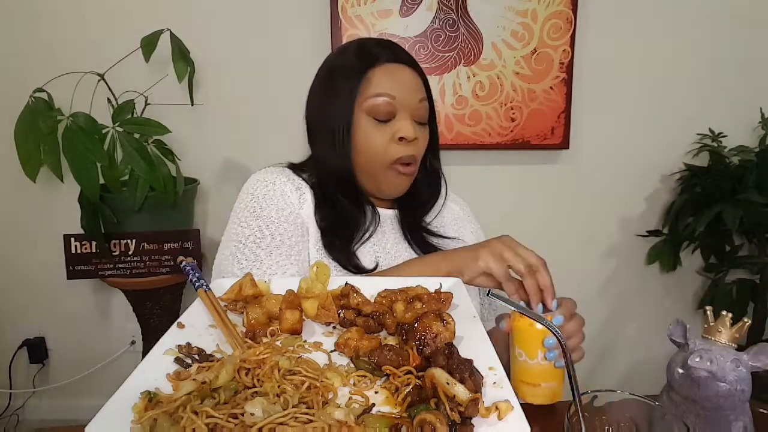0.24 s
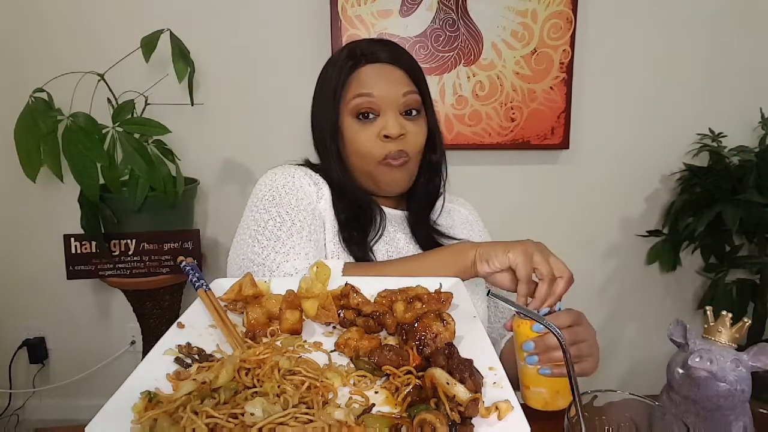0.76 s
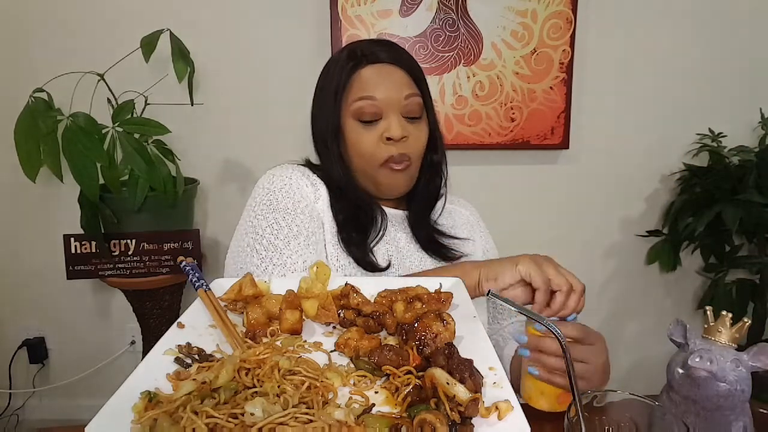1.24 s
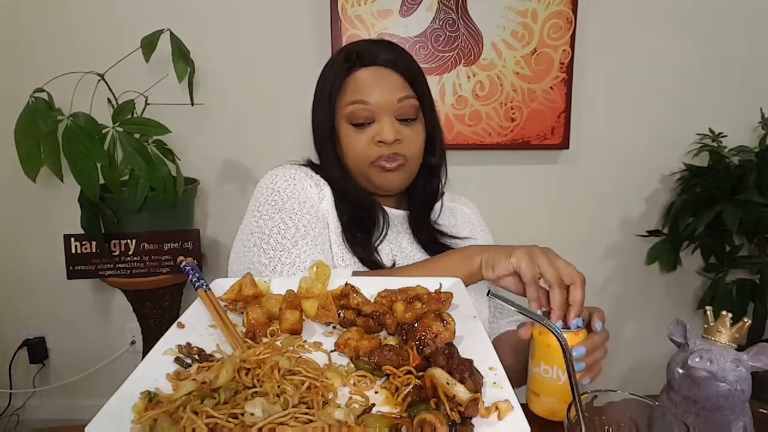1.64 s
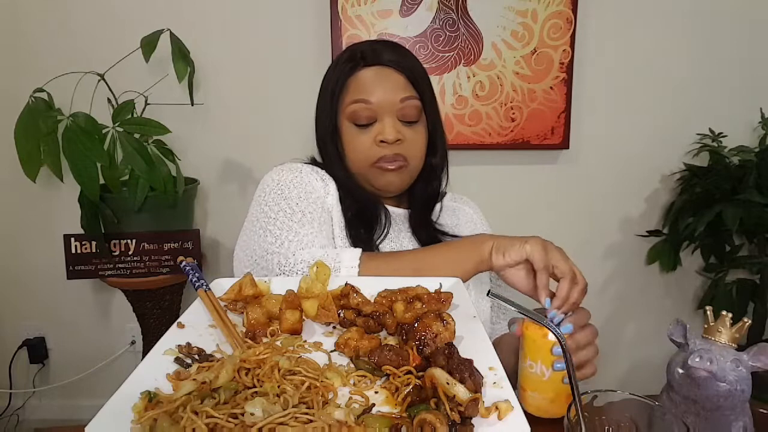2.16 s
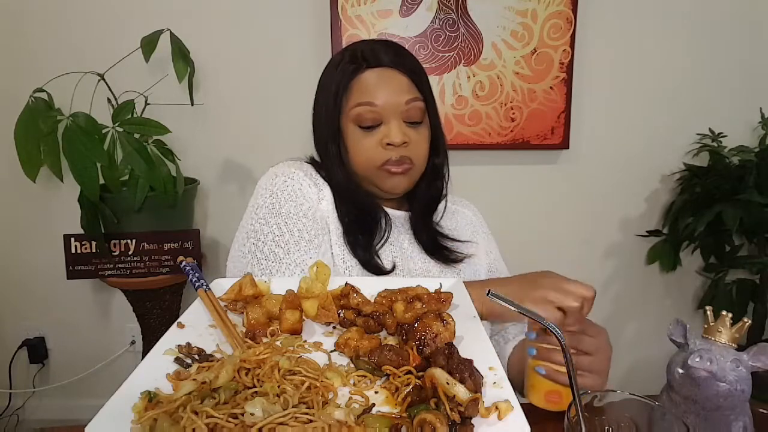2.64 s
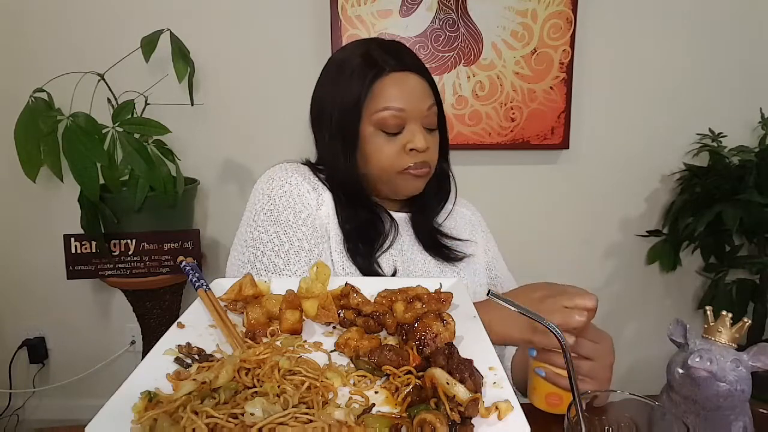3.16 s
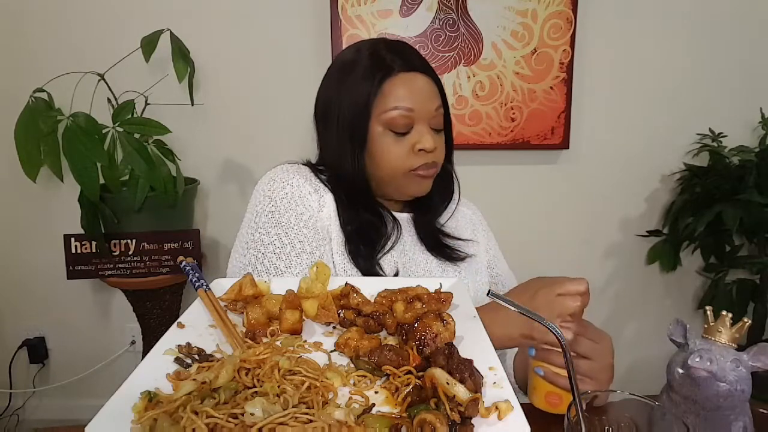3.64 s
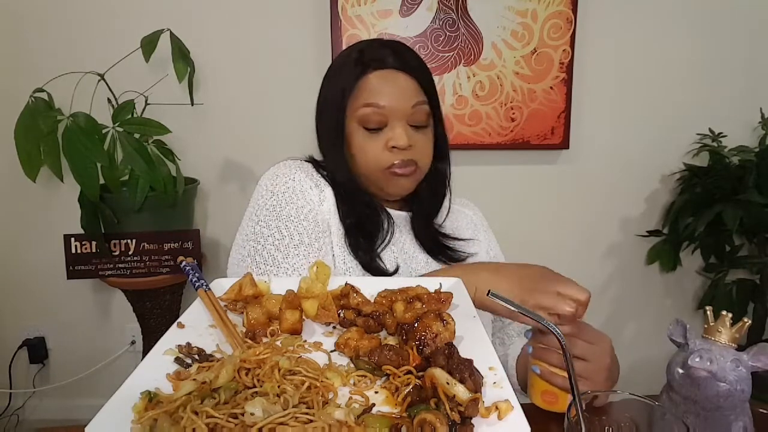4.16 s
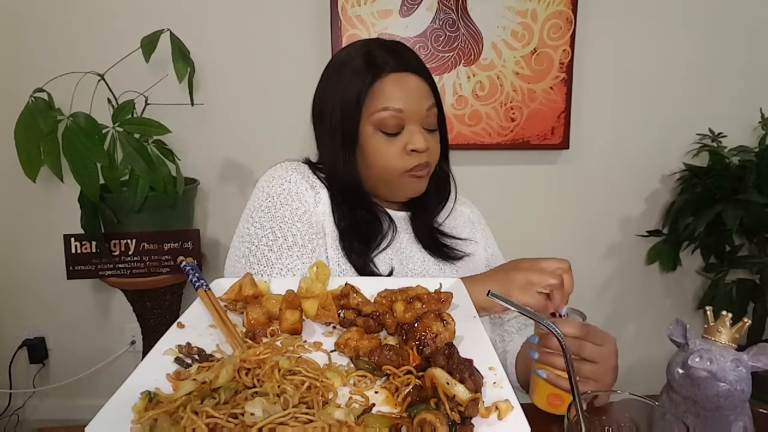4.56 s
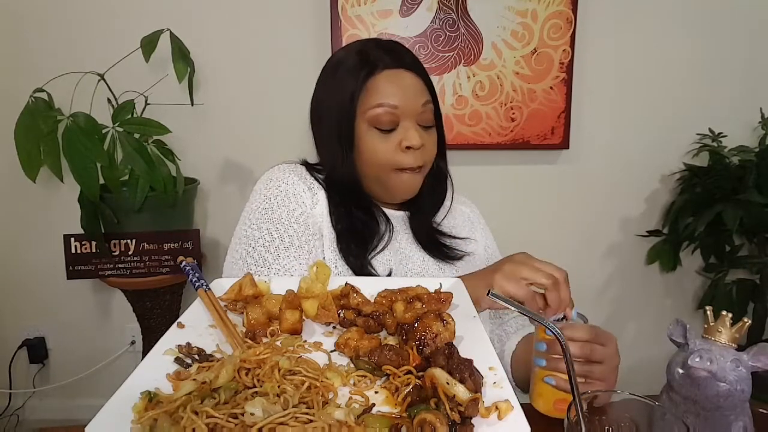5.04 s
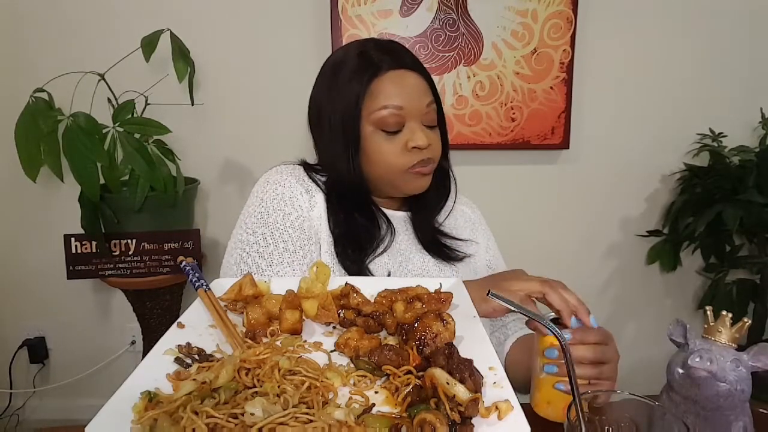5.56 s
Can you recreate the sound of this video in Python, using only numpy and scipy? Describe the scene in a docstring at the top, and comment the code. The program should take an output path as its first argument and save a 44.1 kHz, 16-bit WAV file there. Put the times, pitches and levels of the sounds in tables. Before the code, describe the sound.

Soft knocks and fingernail clicks on a drink can lead to a short fizz, a tab snap and one loud opening pop.

```python
"""A drink can's lid tears open with a loud pop: fracturing aluminium excites the lid and the thin shell.
Before the pop, the can bumps the table and long nails pick at the tab, setting off damped modes;
the seal cracks and a turbulent gas jet hisses, the tab snaps, and the can scuffs by stick-slip friction.
Faint clicks, squeaks and finger rubs come before and after. One microphone hears it all in a bare,
reverberant room with a low steady hush."""
import sys
import numpy as np
from scipy import signal
from scipy.io import wavfile

SR = 44100
rng = np.random.default_rng(int(sys.argv[2]) if len(sys.argv) > 2 else 0)


def waveform_to_disk(signal):
    """Save audio, clipped to [-1, 1], as 16-bit WAV at the path in sys.argv[1]."""
    frames = np.transpose(np.atleast_2d(signal))
    scaled = np.clip(frames, -1, 1) * 32767
    samples = np.round(scaled).astype(np.int16)
    wavfile.write(sys.argv[1], SR, samples)


N = 255364
TAPS = 4096
HZ, TIME = np.fft.rfftfreq(TAPS, 1 / SR), np.arange(N) / SR

# spectra of the panel tearing and the tab snapping: (frequency [Hz], relative level [dB])
POP_SPECTRUM = [(29, -54.5), (50, -23.5), (193, -18.5), (234, -7.5), (371, -18), (601, -15.5), (927, -7.5),
                (1400, -6.5), (2750, -4), (3100, -9), (4140, -4.5), (5400, -14), (8340, -9), (9180, -18),
                (16000, -23)]
SNAP_SPECTRUM = [(150, -31), (280, -12.5), (570, -14.5), (1250, -20.5), (2100, -9), (3200, -10.5),
                 (4000, -5), (4800, -13), (5600, -11), (7400, -10), (10500, -16.5), (14000, -17.5),
                 (15700, -26.5)]
# lid resonances on those spectra: (frequency [Hz], bandwidth [Hz], relative level [dB])
POP_RESONANCES = [(1020, 130, -0.5), (2307, 61, 3.5), (2800, 240, 4), (4250, 270, -8), (7150, 630, -2)]
SNAP_RESONANCES = [(2100, 90, 4.4), (2290, 110, 2.3), (3070, 200, 9.6), (3360, 61, 14), (3850, 30, 11),
                   (5690, 100, 5.2), (7400, 64, 4.8), (12700, 72, 6), (13650, 300, 4)]
# modes of the can's shell and of the table: (frequency [Hz], relative level [dB], t60 [s])
SHELL_MODES = [(1007, -4, 0.7), (1183, 4.5, 0.8), (1486, -7, 1), (1595, -6, 0.63), (2160, -3, 0.84),
               (2150, -3, 0.62), (2634, -3, 0.41), (2750, 4, 0.23), (2780, -9.5, .7), (3350, -9.5, 1),
               (3730, -1.5, 0.47), (4280, -1, 0.64), (6570, -9.5, 0.45), (7900, 2, .55)]
TABLE_MODES = [(170, 1, 0.2), (228.6, -0.5, 0.15), (231.5, -3.5, 0.28), (306, -7, 0.41), (407, -4.5, 0.64),
               (493, -22, .42), (626, -21.5, .42), (2110, -12, 0.69), (2170, -22, 0.29)]
# spectra of the gas jet, wide and then thin: (frequency [Hz], relative level [dB])
WIDE_JET_SPECTRUM = [(200, -6.5), (1000, -19), (2500, -21), (4300, 3), (6500, -1), (8500, -8), (11000, -3),
                     (16000, -20)]
THIN_JET_SPECTRUM = [(200, -18), (1200, -16), (2500, -9.5), (4300, -10), (6000, -10.5), (8200, 1),
                     (10500, -9), (13000, -7.5), (16000, -12.5)]
# can bumping the table: (time [s], level [dB], low-pass cut-off [Hz])
CAN_KNOCKS = [(0.001, -29, 1700), (0.835, -16, 1900), (0.8555, -22, 402), (1.3086, -21, 2010),
              (1.638, -33, 1300), (1.883, -40.5, 1100), (1.989, -47, 1230), (2.14, -37.5, 1100),
              (2.406, -32, 1480), (2.68, -41, 800), (5.113, -40.5, 500)]
# nails, tab and cracking seal flicking the lid:
# (time [s], level [dB], lower mode [Hz], t60 [s], upper mode re lower [dB], tick re lower [dB])
LID_CLICKS = [(0.2445, -42.5, 3527, 0.036, -18, 2), (0.46, -46, 1430, 0.0073, 0, -2.5),
              (0.471, -47, 2050, .017, -7, -7), (0.489, -49, 1320, 0.026, -5, -13),
              (1.226, -52, 1100, 0.0036, -14, -18), (1.3208, -36, 2270, 0.0047, 1, -4.5),
              (1.4809, -47, 1530, 0.0081, -15, -5), (1.6291, -37, 2300, 0.011, -14.5, -7),
              (1.7206, -48.5, 2330, .012, -9, 14), (1.8799, -47, 3320, 0.0084, -26, 5),
              (2.0759, -46.5, 3820, .01, -20, -4.5), (2.1383, -42, 1404, 0.025, -2, 6.5),
              (2.296, -61.5, 4550, .013, 4, 12), (2.6798, -54, 1520, .013, -4, -2),
              (2.962, -26, 4260, 0.0029, -10, -8), (3.1459, -22.5, 1993, 0.0057, 1.5, -12),
              (3.5676, -57.5, 3100, .005, -16, -14), (3.599, -58.5, 1480, .02, -12, -17),
              (3.6124, -46.5, 2950, 0.0018, -15, -1.5), (4.201, -47, 1345, .025, -30, -25),
              (4.864, -43, 4540, .01, 11, 14), (5.2408, -59, 5660, .01, -6, 13),
              (5.767, -36, 1850, 0.0083, -5.5, -2.5)]
# contact spectra of a knock and of a click: (frequency [Hz], relative level [dB])
THUD_SPECTRUM = [(40, -38), (80, 1.5), (130, -4), (220, 8.5), (330, -4.5), (600, -5.5), (850, -12.5),
                 (1200, -12), (1500, -9.5), (1900, -19), (2100, -11), (3000, -23), (9000, -30.5)]
TICK_SPECTRUM = [(150, 4), (700, -11.5), (1500, -11.5), (4000, -8.5), (6000, -8), (8300, -9),
                 (10500, -18.5), (16000, -19.5)]
# can sliding on the table, and fingers on the can: (time [s], duration [s], level [dB])
BASE_SCUFFS = [(3.928, 0.0078, -50), (4.039, 0.12, -43), (4.3, 0.05, -55.5)]
FINGER_RUBS = [(-0.03, 0.025, -44.5), (1.42, 0.37, -59), (2.57, 0.17, -62), (4.98, .2, -64),
               (5.28, 0.034, -68.5), (5.445, 0.03, -65)]
# spectra of those two kinds of friction: (frequency [Hz], relative level [dB])
SCUFF_SPECTRUM = [(50, -22.5), (110, -11), (240, 2), (420, -3), (520, -4), (700, -18.5), (850, -18),
                  (1050, -9), (1260, -25.5), (1540, -19.5), (2200, -28), (6000, -40), (12000, -52.5)]
RUB_SPECTRUM = [(200, -4), (700, 2), (1450, 5.5), (2300, 0.5), (2800, -2.5), (3400, -1.5), (5000, -12),
                (8000, -15.5), (11000, -30), (16000, -22)]
# the base catching and jumping on: (time [s], level [dB])
BASE_JOLTS = [(3.944, -46), (4.0499, -43), (4.0764, -34), (4.136, -39.5)]
# nails and tab sliding on the lid: (time [s], duration [s], level [dB], frequency [Hz])
LID_SQUEAKS = [(0.489, 0.0084, -58, 2035), (1.626, .02, -52, 1470), (3.587, 0.037, -66, 5580),
               (3.62, 0.069, -60, 5700), (5.084, 0.03, -57, 3224), (5.48, 0.032, -71, 3280),
               (5.483, 0.019, -71.5, 7960)]
# the table's low hum swelling as the can is pushed along: (time [s], duration [s], level [dB])
HUM_SWELLS = [(-0.02, 0.053, -42), (0.12, 0.33, -54.5), (0.61, 0.1, -63)]
# reflections from the cluttered table top and a near wall: (delay [s], relative level [dB])
EARLY_ECHOES = [(.0026, -7.5), (.0076, -5.5)]
# the room's reverberation time: (frequency [Hz], t60 [s])
REVERB_TIMES = [(100, 0.96), (240, 0.49), (700, 0.73), (1400, 0.85), (3000, 0.69), (5500, 0.74),
                (8000, 0.62), (11000, .52), (16000, 0.48)]
# spectrum of the room's hush: (frequency [Hz], relative level [dB])
HUSH_SPECTRUM = [(20, -4), (30, 4.5), (50, -6.5), (87, 3), (190, 0), (270, -0.5), (450, -10), (714, -16.5),
                 (1480, -21.5), (2840, -21), (7710, -32.5), (14800, -35.5), (16000, -35.5)]


def lid_pop(s=4.5583, shell_db=-20.5):
    """Impulsive excitation: the scored panel fractures, and the shell rings on in free vibration."""
    pop = fracture(s, POP_SPECTRUM, POP_RESONANCES,
                   crack_db=-10.5, crack_s=0.00027, rip_db=-16, rip_s=0.012, room_db=9)
    add(pop, s, blow(shell_db) * modal_ring(SHELL_MODES))
    return pop


def tab_snap(s=3.7079):
    """Sudden release of stress: the tab gives way and excites the lid's resonances."""
    return fracture(s, SNAP_SPECTRUM, SNAP_RESONANCES,
                    crack_db=-35, crack_s=0.0015, rip_db=-30.5, rip_s=0.0079, room_db=4)


def fracture(s, spectrum, resonances, crack_db, crack_s, rip_db, rip_s, room_db):
    """Source and filter: one crack and a decaying run of tiny fractures drive the resonant lid."""
    force, impulse = np.zeros((2, N))
    add(force, s, blow(crack_db) * burst(crack_s))
    add(force, s, blow(rip_db) * burst(rip_s))
    add(impulse, s, np.array([blow(rip_db + room_db)]))  # the room answers the whole rip as one blow
    peaks = sum(gain_of(db) ** 2 / (1 + (2 * (HZ - hz) / width) ** 2) for hz, width, db in resonances)
    lid_db = read(spectrum) + 10 * np.log10(1 + peaks)
    return through(with_echoes(force) + reverb(impulse, build_s=rip_s), lid_db)


def gas_hiss(start_s=2.962, length_s=0.2, db=-31.5, narrowing_s=0.024, wide_db=-2, room_db=-1):
    """Turbulent jet noise: gas escapes the cracked seal, thinning and brightening as pressure drops."""
    age = np.maximum(TIME - start_s, 0)
    thin_share = 0.85 * (1 - np.exp(-age / narrowing_s))
    wide = through(grains(per_s=25000, spread_db=2.5), read(WIDE_JET_SPECTRUM))
    thin = through(grains(per_s=25000, spread_db=2.5), read(THIN_JET_SPECTRUM))
    flow = strokes([(start_s, length_s, db)], attack_s=0.0094, fall_db_per_s=616)
    hiss = flow * (gain_of(wide_db) * np.sqrt(1 - thin_share) * wide + thin_share * thin)
    return hiss + gain_of(room_db) * reverb(hiss)


def can_knocks(ring_db=-3, room_db=-5.5, settle_s=0.028, contact_s=0.00034):
    """Impact: the can's rim settles and excites the table's modes; softer contact gives less treble."""
    out = np.zeros(N)
    for s, db, cutoff_hz in CAN_KNOCKS:
        body = gain_of(ring_db) * modal_ring(TABLE_MODES)
        add(body, 0, unit(through(burst(settle_s), read(THUD_SPECTRUM))))
        body *= 1 - np.exp(-TIME[:SR] / contact_s)  # the force builds up as the base flattens
        softened = signal.lfilter(*signal.butter(1, cutoff_hz, fs=SR), body)
        add(out, s, blow(db) * unit(softened))
    return out + gain_of(room_db) * reverb(out)


def lid_clicks(upper_ratio=1.84, scrape_s=0.0012, room_db=-1):
    """Plucking: each catch and release gives a tick and two lid modes that depend on where it lands."""
    out = np.zeros(N)
    for s, db, hz, t60, upper_db, tick_db in LID_CLICKS:
        click = unit(mode(hz, t60)) - gain_of(upper_db) * unit(mode(upper_ratio * hz, t60))
        tick = unit(through(burst(scrape_s), read(TICK_SPECTRUM)))
        add(click, 0, gain_of(tick_db) * tick)
        add(out, s, blow(db) * unit(click))
    return with_echoes(out) + gain_of(room_db) * reverb(out)


def handling(grip_db=-74.5, room_db=-2, table_db=-2, base_db=-13, jolt_s=0.004):
    """Stick-slip friction: coarse under the base, fine under the fingers; both drive the table's modes."""
    slips = grains(per_s=220, spread_db=1) * strokes(BASE_SCUFFS, attack_s=0.0089, fall_db_per_s=261)
    for s, db in BASE_JOLTS:
        add(slips, s, blow(db) * burst(jolt_s))
    rubbing = gain_of(grip_db) + strokes(FINGER_RUBS, attack_s=0.038, fall_db_per_s=159)
    fingers = grains(per_s=1200, spread_db=3) * rubbing
    friction = through(slips, read(SCUFF_SPECTRUM)) + through(fingers, read(RUB_SPECTRUM))
    table = signal.fftconvolve(fingers + gain_of(base_db) * slips, modal_ring(TABLE_MODES))[:N]
    return friction + gain_of(room_db) * reverb(friction) + gain_of(table_db) * table


def lid_squeaks(half_width_hz=60, room_db=-1):
    """Friction-driven resonance: each short slide keeps one lid mode singing roughly."""
    out = np.zeros(N)
    for s, length, db, hz in LID_SQUEAKS:
        slide = strokes([(s, length, db)], attack_s=0.004, fall_db_per_s=500)
        out += narrow_noise(hz, half_width_hz) * slide
    return out + gain_of(room_db) * reverb(out)


def table_hum(floor_db=-70):
    """Forced vibration: the table's low hum swells as the can is pushed along."""
    swell = gain_of(floor_db) + strokes(HUM_SWELLS, attack_s=0.014, fall_db_per_s=139)
    return narrow_noise(hz=231, half_width_hz=22) * swell


def with_echoes(x, scatter_s=0.0013):
    """Early reflection: the direct sound plus delayed copies, each scattered a little."""
    out = x.copy()
    for s, db in EARLY_ECHOES:
        add(out, s, gain_of(db) * signal.oaconvolve(x, burst(scatter_s)))
    return out


def reverb(x, build_s=0.003):
    """Diffuse reverberation: dense reflections build up, and each band decays at its own rate."""
    reflections = grains(per_s=9000, spread_db=-2)[:SR]
    hz, t, bands = signal.stft(reflections, SR, nperseg=256)
    bands *= np.exp(-np.log(1000) * t / read(REVERB_TIMES, hz)[:, None])
    onset = 1 - np.exp(-(TIME[:SR] / build_s) ** 2)
    tail = signal.istft(bands, SR, nperseg=256)[1][:SR] * onset
    return signal.fftconvolve(x, unit(tail))[:N]


def room_hush(db=-60.5):
    """Ambient noise: the steady hush of the room."""
    return gain_of(db) * through(rng.standard_normal(N), read(HUSH_SPECTRUM))


def mode(hz, t60):
    """Damped oscillation, one second long; it takes about a cycle to start."""
    t = TIME[:SR]
    decay = np.exp(-np.log(1000) * t / t60)
    onset = 1 - np.exp(-2 * hz * t)
    return np.sin(2 * np.pi * hz * t) * decay * onset


def modal_ring(modes):
    """Superposition of a struck body's modes, with unit energy."""
    return unit(sum(gain_of(db) * mode(hz, t60) for hz, db, t60 in modes))


def burst(decay_s):
    """Exponentially decaying random force, with unit energy."""
    return unit(rng.standard_normal(TAPS) * np.exp(-TIME[:TAPS] / decay_s))


def grains(per_s, spread_db):
    """Shot noise: impulses of uneven size at random moments, with unit rms."""
    size = gain_of(spread_db * np.minimum(rng.exponential(1, N), 4))
    sign = rng.choice([-1, 1], N)
    occurs = rng.random(N) < per_s / SR
    return unit(size * sign * occurs) * np.sqrt(N)


def narrow_noise(hz, half_width_hz):
    """Noise filtered by one steep resonance, with rms near one."""
    return through(rng.standard_normal(N), -20 * np.log10(1 + ((HZ - hz) / half_width_hz) ** 2))


def strokes(rows, attack_s, fall_db_per_s):
    """Amplitude envelope: each stroke rises, holds to the end of its length and decays exponentially."""
    envelope = np.zeros(N)
    for s, length, db in rows:
        rise = np.clip((TIME - s) / attack_s, 0, 1)
        envelope += rise * gain_of(db - fall_db_per_s * np.maximum(TIME - s - length, 0))
    return envelope


def through(x, db):
    """Minimum-phase filtering by a unit-energy response with this spectral shape."""
    log_gain = np.log(gain_of(np.maximum(db - db.max(), -100)))
    mirrored = np.concatenate([log_gain, log_gain[-2:0:-1]])
    spectrum = np.exp(np.conj(signal.hilbert(mirrored)))  # the Hilbert transform supplies the phase
    return signal.oaconvolve(x, unit(np.fft.ifft(spectrum).real))[:len(x)]


def read(points, hz=HZ):
    """Linear interpolation over log frequency."""
    f, value = np.transpose(points)
    return np.interp(np.log(hz + 1), np.log(f + 1), value)


def blow(db):
    """Size of an impulse whose energy equals 5 ms at this level."""
    return gain_of(db) * np.sqrt(SR / 200)


def gain_of(db):
    """Amplitude ratio of a level in decibels."""
    return 10 ** (np.asarray(db) / 20)


def unit(x):
    """Normalisation to unit energy."""
    return x / np.sqrt(np.sum(x ** 2) + 1e-20)


def add(mix, s, sound):
    """Superposes a sound on the mix from s seconds on."""
    part = mix[max(round(s * SR), 0):][:len(sound)]
    part += sound[:len(part)]


def scene():
    """Superposition of all sources at one point, the same in both channels."""
    mono = tab_snap() + lid_pop() + can_knocks() + lid_clicks() + lid_squeaks() + gas_hiss()
    mono += handling() + table_hum() + room_hush()
    return np.array([mono, mono])


def record(dry, low_cut_hz=55, clip_level=0.85, high_cut_hz=15800):
    """Band limiting and saturation: the microphone sheds deep bass, clips peaks and cuts the top treble."""
    lean = signal.sosfilt(signal.butter(2, low_cut_hz, "high", fs=SR, output="sos"), dry)
    clipped = np.clip(lean, -clip_level, clip_level)
    low_pass = signal.firwin(511, high_cut_hz, window=("kaiser", 9), fs=SR)
    return signal.oaconvolve(clipped, low_pass[None], "same")


dry = scene()
out = record(dry)
waveform_to_disk(out)
```